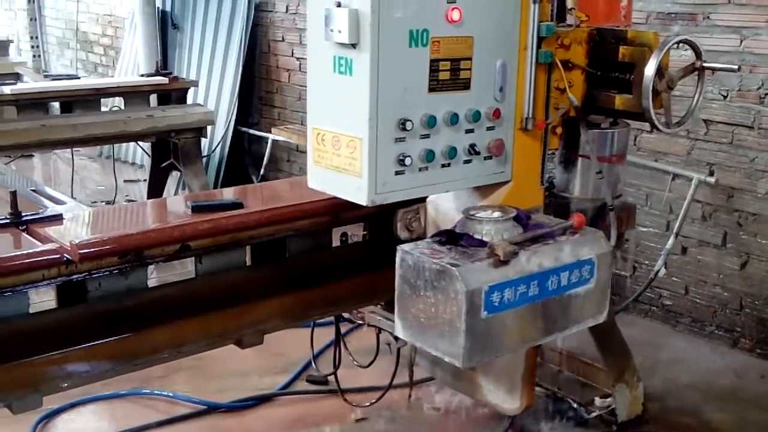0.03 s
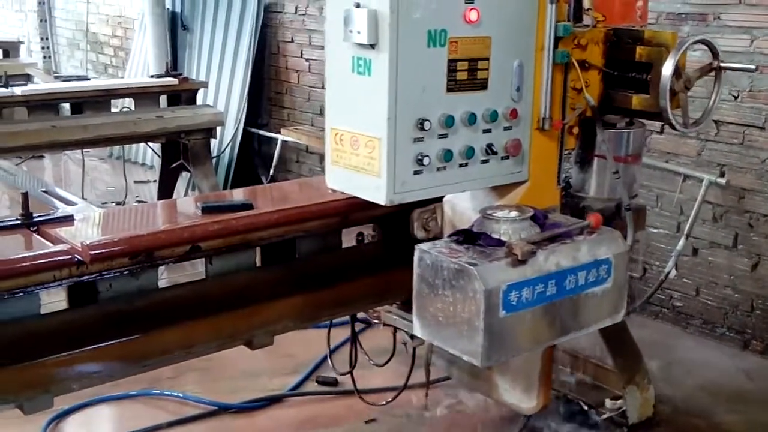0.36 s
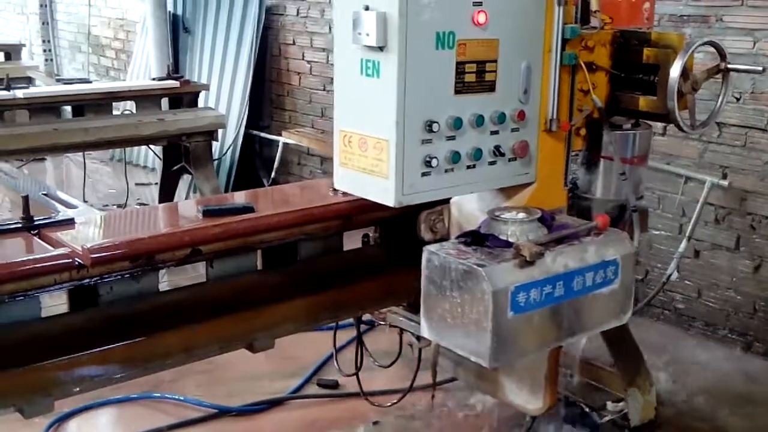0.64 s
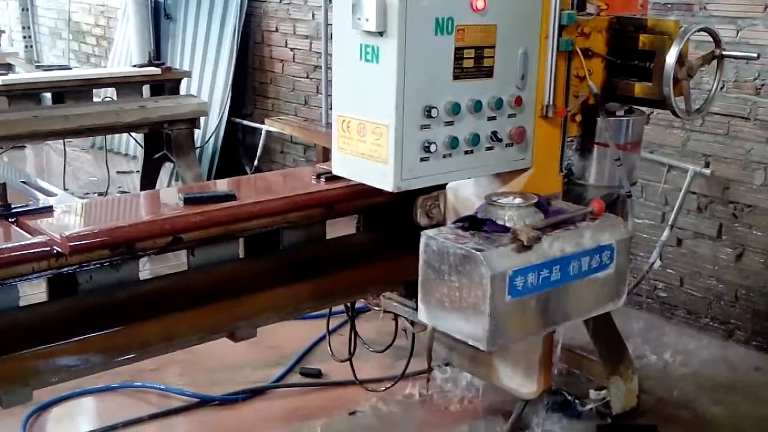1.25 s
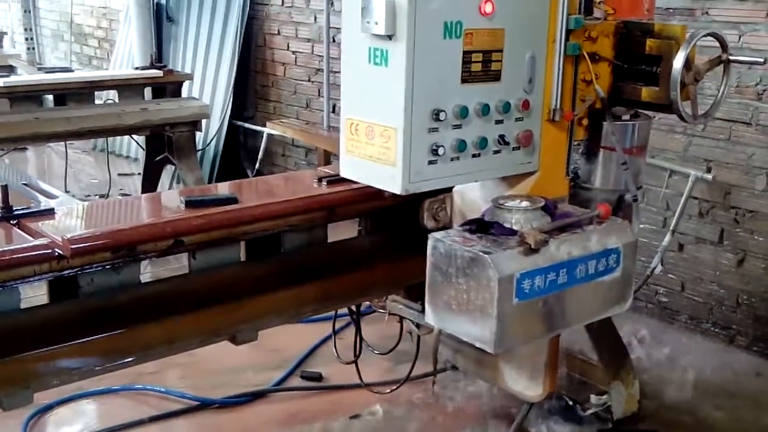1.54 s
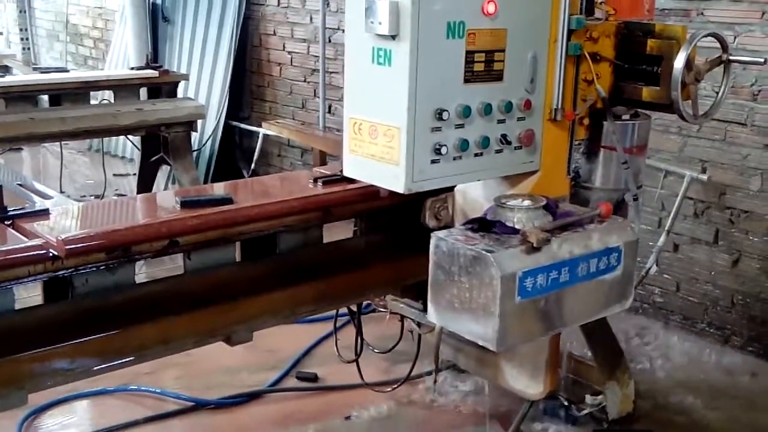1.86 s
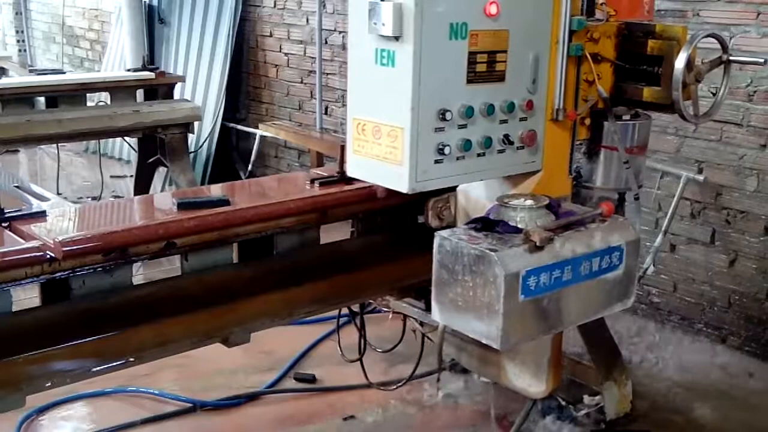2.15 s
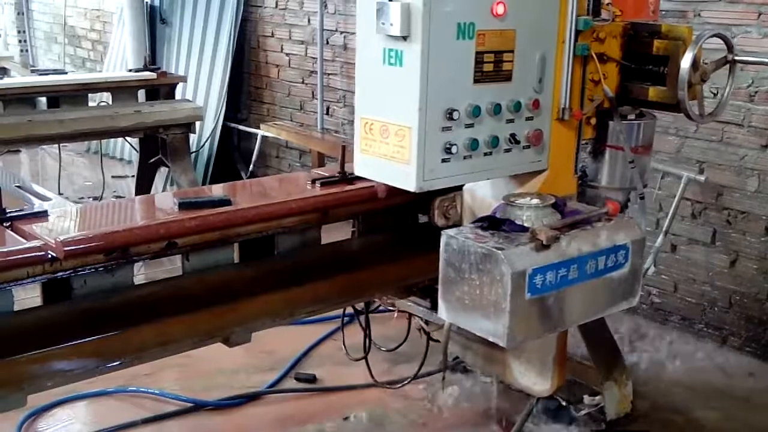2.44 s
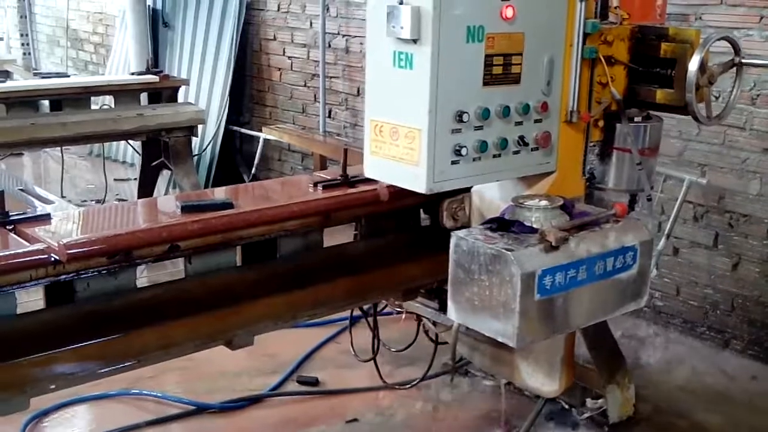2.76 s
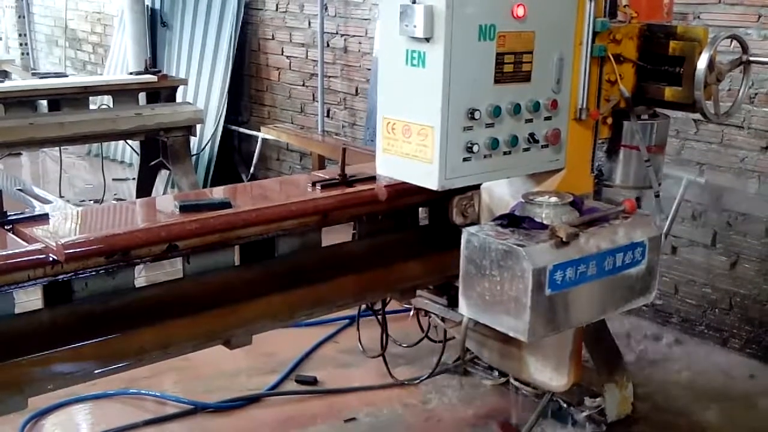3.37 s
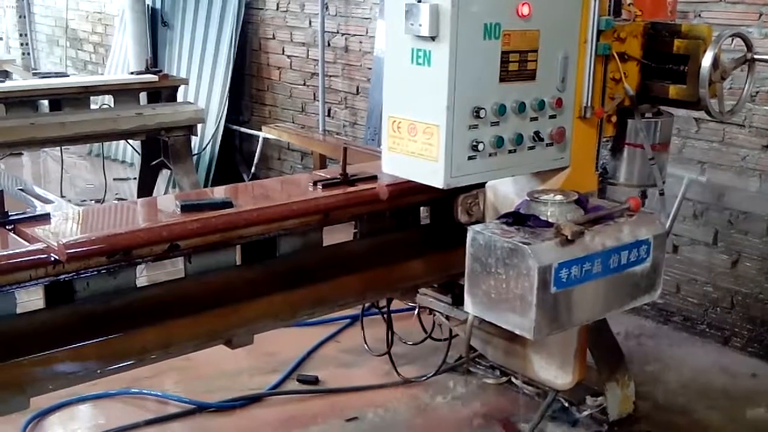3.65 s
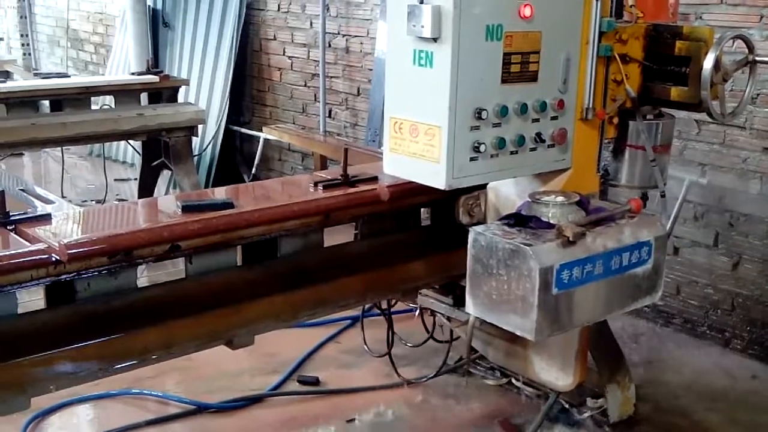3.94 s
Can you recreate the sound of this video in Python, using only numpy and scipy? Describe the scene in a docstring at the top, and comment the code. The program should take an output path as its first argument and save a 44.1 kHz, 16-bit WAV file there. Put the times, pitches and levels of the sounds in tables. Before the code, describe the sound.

A stone edging machine grinds loudly, close up in a workshop. Its wheel growls, chatters and bumps on a slab, then lifts off, while a faster tool rasps and finally screeches over motor whine and spray hiss.

```python
"""A stone edging machine's slow segmented wheel growls and chatters on a slab, bumps, then lifts off.
Its rough face scrapes by once a turn and shakes the slab's resonance. A faster spindle rasps and
sings, eases off, and bites again with a screech at the end. Underneath, the drive whines and cooling
spray hisses over the frame's low rumble, all close to one microphone that overloads on the peaks."""
import sys
import numpy as np
from scipy import signal
from scipy.fft import rfft, irfft
from scipy.io import wavfile
from scipy.ndimage import map_coordinates

SR = 44100
rng = np.random.default_rng(int(sys.argv[2]) if len(sys.argv) > 2 else 0)


def transcribe(u):
    """Save the signal u as a 16-bit wav file named by the first command-line argument.

    u: samples, shape (n,) or (channels, n), limited to [-1, 1]; the rate is SR.
    q: integer samples, one column per channel.
    """
    v = np.clip(np.atleast_2d(u).T, -1, 1)
    q = np.round(v * 32767).astype(np.int16)
    wavfile.write(sys.argv[1], SR, q)


N = 176400
TIME = np.arange(N) / SR
WHEEL_HZ, SPINDLE_HZ = 24.815, 43.075  # turn rates; an order is a multiple of one
LIFT_S = 2.79  # the wheel leaves the slab

# Colour of wheel grinding stone: freq_hz, level_db
GRIND_COLOUR = [(120,-39),(250,-15),(450,-8.5),(580,-6),(740,-1.5),(920,-5.5),(1200,-4),(1400,-3.5),(1660,3),(1900,-4),(2100,-3.5),(2500,-9.5),(4000,-8.5),(7000,-24.5),(9000,-56)]
# Colour of the slab's resonance: freq_hz, level_db
SLAB_COLOUR = [(1200,-38),(1540,-0.5),(1670,6),(1810,-4),(2200,-57)]
# Fader for whine and spray, lower under loud grinding: time_s, gain_db
BED_FADER = [(0,-4),(1,0),(2.3,1.5),(3,-0.5),(3.85,-1.5),(3.92,-8),(4,-8)]


def wheel():
    """Segments strike the slab and the rough face scrapes it; the contact turns bumpy, then lifts."""
    # Grinding level, set by the wheel's pressure: time_s, level_db
    pressure = [(0,-16),(.13,-13.5),(.7,-12.5),(1,-12),(1.27,-14),(1.335,-17),(1.375,-12),(1.49,-13),(1.515,-18.5),(1.59,-16),(1.74,-17.5),(1.915,-18.5),(1.99,-18),(2.02,-14.5),(2.17,-13),(2.195,-15),(2.24,-14),(2.34,-15),(2.38,-19.5),(2.42,-16),(2.59,-21.5),(2.62,-16),(2.74,-22.5),(2.85,-27)]
    # The slab's ringing: time_s, level_db
    slab_level = [(0,-19.5),(.75,-19),(1.15,-22.5),(1.48,-25),(1.53,-26),(1.98,-37),(2.03,-19),(2.25,-28),(2.85,-42)]
    # The wheel's loudest tone: time_s, level_db
    hum_level = [(0,-28),(.3,-21),(.5,-22),(.65,-17.5),(1.05,-16.7),(1.8,-25),(2.2,-17.5),(2.73,-25.5),(2.85,-44)]
    # Partials of the four segments, a list each: order, level_db (even contact), level_db (bumpy)
    orders = [20, 28, 30, 32, 36, 42, 44, 46, 48, 52, 60, 62, 64, 66, 68, 74, 82]
    even_levels = [-13.5, -7, -15, 2, -12, -9, -5, -15, -3, -2, -7.5, -7, 1, -9, -1.5, -8, -6]
    bumpy_levels = [-10, -19, -6, -1, -31, -11, -13, -29, -15, -2.5, -5.5, -28, -12, -4.5, -2, -13, -6]
    bumpy_from_s, blend_s, lift_db_per_s, shake_above_hz = 1.16, 0.36, 53, 1400

    turns = WHEEL_HZ * TIME + 0.0016 * wander(3.7)
    strike_turns = turns - 0.07  # a segment lands just into each turn
    bumpy = np.clip((TIME - bumpy_from_s) / blend_s, 0, 1)
    shake = (1 - bumpy) * throb(turns, peak=0.58, depth_db=6)
    shake += bumpy * throb(turns, peak=0.05, depth_db=6)
    surge = throb(turns, peak=0.2, depth_db=3.5)
    growl = np.zeros(N)
    for order, even_db, bumpy_db in zip(orders, even_levels, bumpy_levels):
        gain = amp(even_db + bumpy * (bumpy_db - even_db))
        pulse = np.sqrt(shake) if order * WHEEL_HZ > shake_above_hz else surge
        partial = tone(order * strike_turns, waver_db=1.3, slip_rad=0.14, rate_hz=5, scatter=0.55)
        growl += gain * pulse * partial
    swing = 0.29 * (1 - 0.11 * bumpy) * np.cos(2 * np.pi * 2 * strike_turns)  # twice a turn
    chatter = unit((1 + swing) * amp(bumpy * wander(25)))
    rattle = amp(-5) * tool_face(turns, WHEEL_HZ, GRIND_COLOUR, wear=0.46)
    grit = amp(-6.5) * noise(GRIND_COLOUR)
    grinding = amp(curve(pressure)) * (amp(-3) * unit(growl) + chatter * (rattle + grit))
    resonance = tool_face(turns, WHEEL_HZ, SLAB_COLOUR, wear=0.74, count=30)
    slab = amp(curve(slab_level)) * unit(shake * resonance)
    hum = amp(curve(hum_level)) * tone(16 * turns, waver_db=0.6, slip_rad=0.07, rate_hz=6)
    lift = amp(-lift_db_per_s * np.maximum(TIME - LIFT_S, 0))
    return lift * (grinding + slab + hum)


def knocks():
    """The wheel bumps on the slab: short gritty blows that ring its resonance."""
    # Bumps: start_s, level_db
    bumps = [(1.367,-19),(1.568,-22),(1.643,-16),(1.725,-15),(1.772,-18),(1.85,-22.5),(1.93,-12.5),(2.012,-15.5),(2.234,-14.5)]
    rise_s = 0.006
    envelope = np.zeros(N)
    for start_s, level_db in bumps:
        age = np.maximum(TIME - start_s, 0) / rise_s
        envelope += amp(level_db) * age * np.exp(1 - age)
    return envelope * (noise(SLAB_COLOUR) + amp(-4) * noise(GRIND_COLOUR))


def spindle():
    """The fast tool rubs the stone: a singing, buzzing rasp that screeches under pressure."""
    # Rasp level, set by the spindle's pressure: time_s, level_db
    pressure = [(0.0, -8.5), (0.02, -7.5), (0.22, -9.5), (0.51, -9.5), (0.9, -17), (1.98, -19),
                (2.02, -17.5), (2.53, -19.5), (2.63, -17), (3.02, -19.5), (3.84, -18), (3.88, -10),
                (3.93, -8.5), (4.0, -9)]
    # Colour of the rasp: freq_hz, level_db
    rasp_colour = [(300,-34),(1300,-19.5),(1950,-1.5),(2400,-8.5),(3000,-11),(3500,-3.5),(4000,0),(4450,-5.5),(5200,-3),(5900,1),(6550,1),(7200,-6.5),(7700,-13.5),(8300,-24),(10000,-33.5)]
    # The spindle's loudest tone: time_s, level_db
    sing_level = [(0,-23),(1.44,-33),(1.48,-17.5),(1.62,-19),(1.75,-21),(1.82,-28.5),(2.3,-26),(3.3,-27.5),(3.36,-25),(3.45,-22.5),(3.51,-29),(3.57,-23),(3.65,-22),(3.7,-26),(3.83,-33),(3.88,-19),(4,-16)]
    # Faint squeal before the bite: time_s, level_db
    squeal_level = [(3.3,-48),(3.66,-34),(3.72,-21),(3.76,-37),(3.8,-26),(3.85,-36)]
    # Thin ring of the tool under light pressure: time_s, level_db
    ring_level = [(0,-49),(.8,-29),(1.25,-24.5),(1.55,-26),(1.9,-36),(2.2,-24),(2.6,-36),(4,-33)]
    # Screech partials, a list each: order, level_db (first pass), level_db (final bite)
    orders = [39, 78, 83, 88, 90, 92, 98, 107, 113, 118, 129, 131, 145, 149, 157, 165, 173]
    first_levels = [-14, -9.5, -11.5, -11, -5, -10, -7, -9.5, -10, -11, -10.5, -4.5, -8, -10, -17, -15,
                    -17.5]
    bite_levels = [-10, -9.5, -4, -6, -7, -1, 1.5, -4, -7, -3, 0, -14, -6, -0.5, -12, -6, -13]
    ring_hz, bite_from_s, heavy_db = 3639, 3, -9

    turns = SPINDLE_HZ * TIME + 0.002 * wander(1.99)
    pressure_db = curve(pressure)
    buzz = amp(-5) * tool_face(turns, SPINDLE_HZ, rasp_colour, wear=0.94)
    scrape = amp(-1.5) * noise(rasp_colour)
    sing = amp(curve(sing_level)) * tone(48 * turns, waver_db=1.5, slip_rad=0.36, rate_hz=13)
    squeal = amp(curve(squeal_level)) * tone(117 * turns, waver_db=2, slip_rad=1.4, rate_hz=30)
    screech = np.zeros(N)
    for order, first_db, bite_db in zip(orders, first_levels, bite_levels):
        gain = amp(np.where(TIME < bite_from_s, first_db, bite_db))
        screech += gain * tone(order * turns, waver_db=2.2, slip_rad=0.9, rate_hz=20)
    screech *= amp(-16 + 2.21 * (pressure_db - heavy_db))  # swells more steeply than the rasp
    ring = amp(curve(ring_level)) * tone(ring_hz * TIME, waver_db=1.5, slip_rad=0.21, rate_hz=15)
    return amp(pressure_db) * (buzz + scrape) + sing + squeal + screech + ring


def drive_whine():
    """The spindle drive whines; two whistling partials are damped until the load eases."""
    # Whine partials, a list each: order, level_db
    orders = [3, 5, 7, 9, 10, 15, 24, 45, 46, 53, 72, 91, 96, 142, 157]
    levels = [-48, -41.5, -34, -36, -36.5, -39, -33, -29, -32, -37.5, -35.5, -35, -40, -42, -41]
    whistle_orders = (45, 46)
    damping_db = 12 * np.clip(1 - TIME / LIFT_S, 0, 1)
    whine = np.zeros(N)
    for order, level_db in zip(orders, levels):
        gain = amp(level_db - damping_db * (order in whistle_orders))
        whine += gain * tone(order * SPINDLE_HZ * TIME, waver_db=2.5, slip_rad=0.29, rate_hz=3.3)
    return amp(curve(BED_FADER)) * whine


def spray():
    """Cooling spray and motor air hiss with a slight flutter."""
    # Colour of the hiss: freq_hz, level_db
    hiss_colour = [(300,-8.5),(600,8.5),(1000,9.5),(1400,9),(2000,11.5),(2700,6.5),(4000,6),(6500,-11),(8200,-9),(10000,-11),(13000,-19),(15500,-90)]
    return amp(curve(BED_FADER) - 21.5 + 0.34 * wander(25)) * noise(hiss_colour)


def rumble():
    """The machine's frame vibrates low under everything."""
    # Colour of the rumble: freq_hz, level_db
    rumble_colour = [(15,-29),(42,-28),(75,-7),(105,-7.5),(140,-1.5),(190,-1.5),(250,4.5),(370,0.5),(520,-6.5),(1000,-45)]
    # Its swell: time_s, level_db
    rumble_level = [(0,-36),(1,-31),(2.3,-28.5),(3,-29.5),(3.84,-29),(4,-38)]
    return amp(curve(rumble_level)) * noise(rumble_colour)


def tool_face(turns, turn_hz, spectrum, wear, count=14, size=8192):
    """The same rough face passes once a turn; wear slowly morphs it through count patterns."""
    hz = np.arange(size // 2 + 1) * turn_hz
    lasting = np.exp(2j * np.pi * rng.random(len(hz)))
    real, imag = rng.standard_normal((2, count, len(hz)))
    faces = irfft((lasting + wear * (real + 1j * imag)) * colour(spectrum, hz) * (hz > 0), size)
    path = [np.linspace(0, count - 1, N), turns % 1 * size]
    return unit(map_coordinates(faces, path, order=1, mode="grid-wrap"))


def throb(turns, peak, depth_db):
    """A gain that swells once a turn, cresting at the fraction peak of the turn."""
    return unit(amp(depth_db * np.cos(2 * np.pi * (turns - peak))))


def tone(cycles, waver_db, slip_rad, rate_hz, scatter=1):
    """One partial wavering in level and phase; its starting phase is random within scatter cycles."""
    phase = 2 * np.pi * (cycles + scatter * rng.random()) + slip_rad * wander(rate_hz)
    return unit(np.sin(phase) * amp(waver_db * wander(rate_hz)))


def wander(rate_hz):
    """Slow random motion of rms 1."""
    hz = np.arange(400) * SR / N
    bins = rng.standard_normal(len(hz)) + 1j * rng.standard_normal(len(hz))
    return unit(irfft(bins * (hz > 0) / (1 + (hz / rate_hz) ** 2), N))


def noise(spectrum):
    """Coloured noise of rms 1."""
    white = rfft(rng.standard_normal(N))
    return unit(irfft(white * colour(spectrum, np.fft.rfftfreq(N, 1 / SR)), N))


def colour(spectrum, hz):
    """Gain at hz of an EQ curve of freq_hz, level_db rows."""
    freq_hz, level_db = np.transpose(spectrum)
    return amp(np.interp(np.log(hz + 1), np.log(freq_hz + 1), level_db))


def curve(points):
    """Joins time_s, value rows by straight lines."""
    return np.interp(TIME, *np.transpose(points))


def amp(db):
    """Decibels to gain."""
    return 10 ** (np.asarray(db) / 20)


def unit(x):
    """Scales to rms 1."""
    return x / np.sqrt(np.mean(x ** 2) + 1e-20)


def scene():
    """The whole machine, the same in both channels."""
    return np.tile(wheel() + knocks() + spindle() + drive_whine() + spray() + rumble(), (2, 1))


def record(dry):
    """The close microphone clips the loudest peaks; a low-pass trims the top."""
    trim_db, ceiling, cutoff_hz = -0.52, 0.96, 15600
    clipped = np.clip(amp(trim_db) * dry, -ceiling, ceiling)
    low_pass = signal.firwin(511, cutoff_hz, window=("kaiser", 8), fs=SR)
    return signal.oaconvolve(clipped, low_pass[None], "same")


dry = scene()
out = record(dry)
transcribe(out)
```